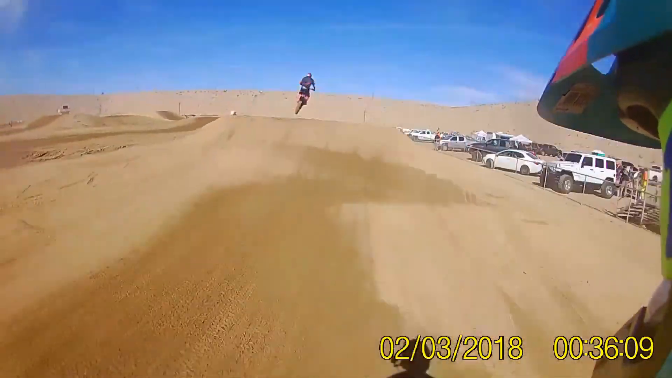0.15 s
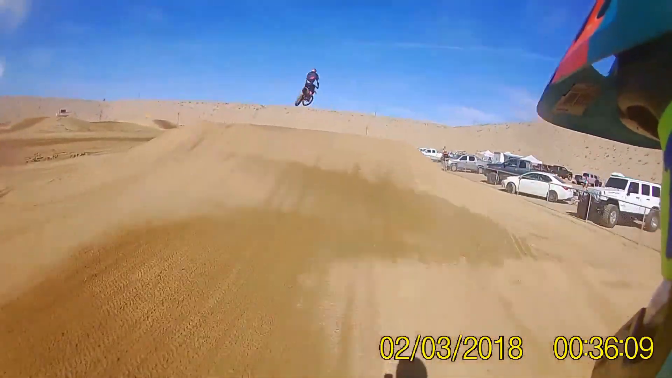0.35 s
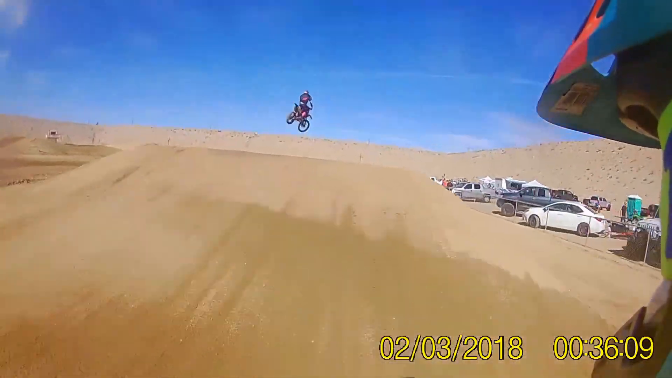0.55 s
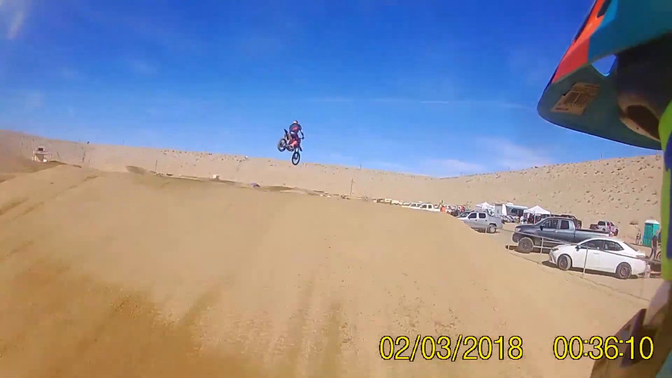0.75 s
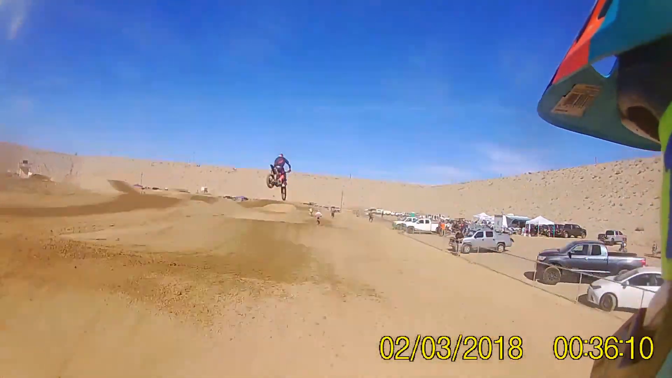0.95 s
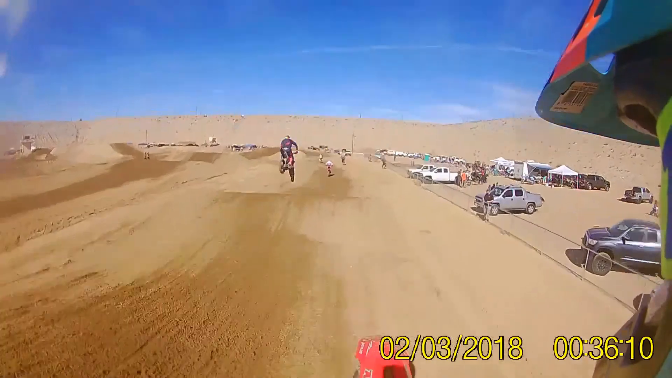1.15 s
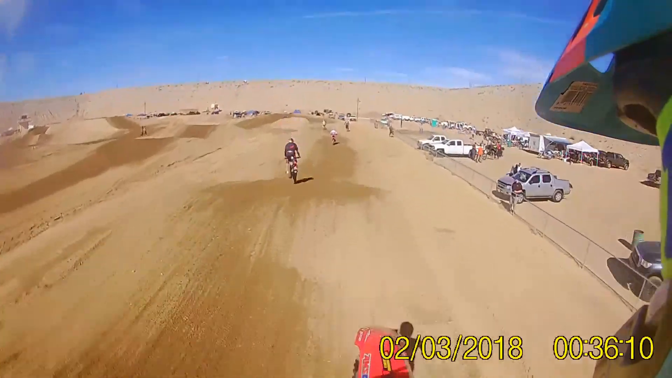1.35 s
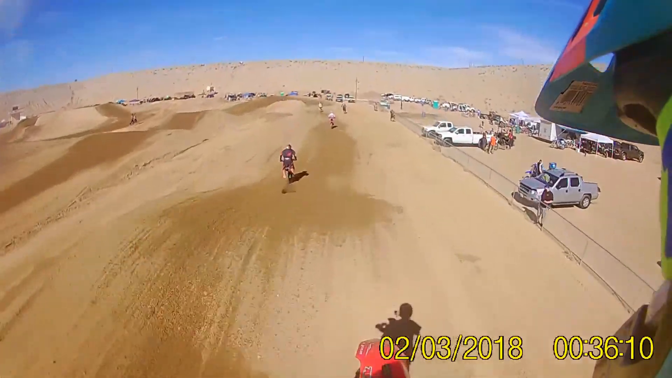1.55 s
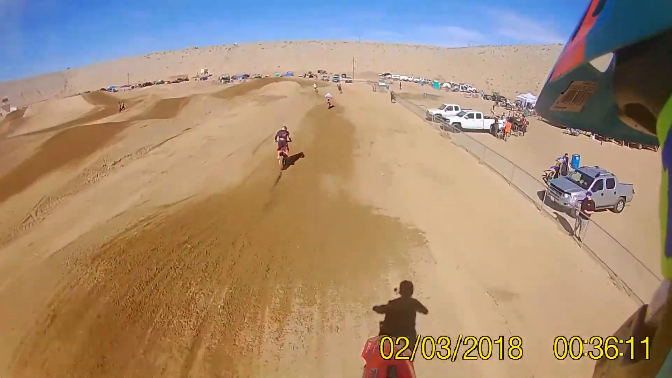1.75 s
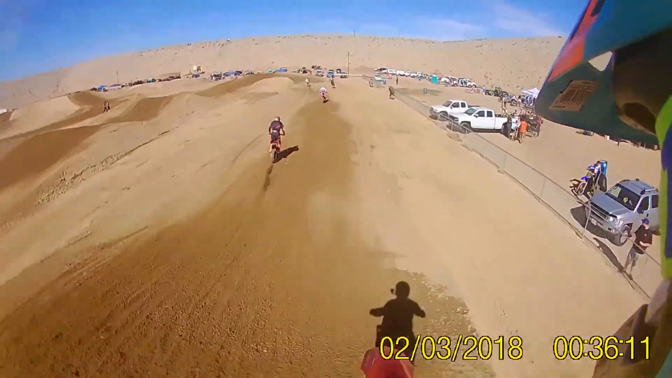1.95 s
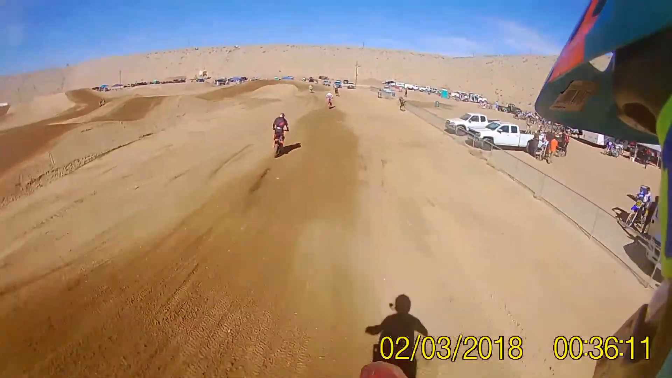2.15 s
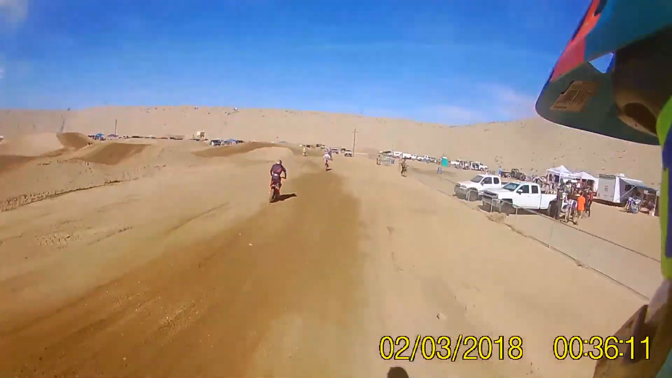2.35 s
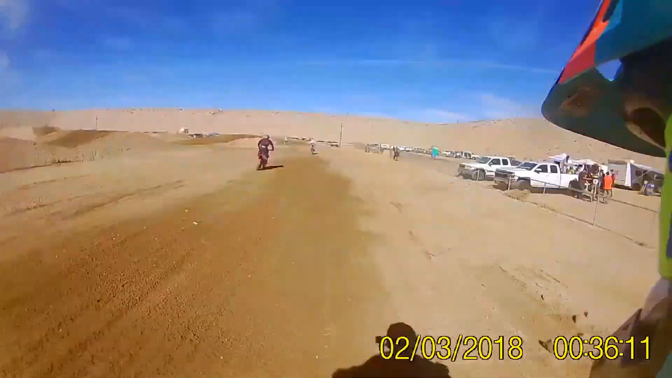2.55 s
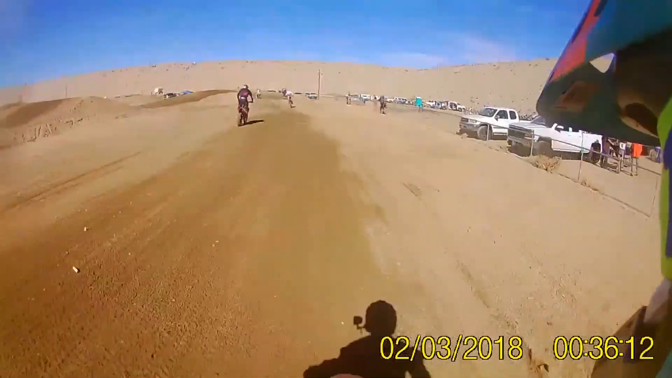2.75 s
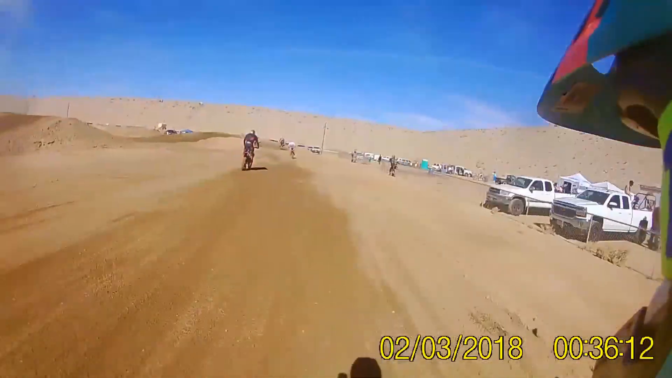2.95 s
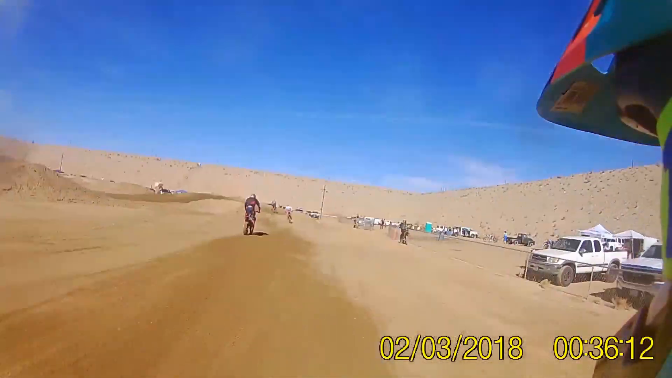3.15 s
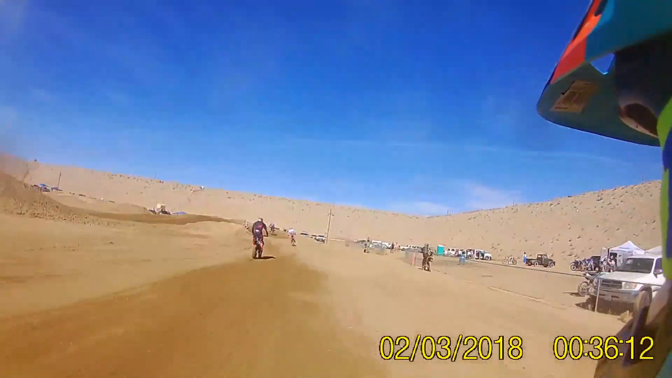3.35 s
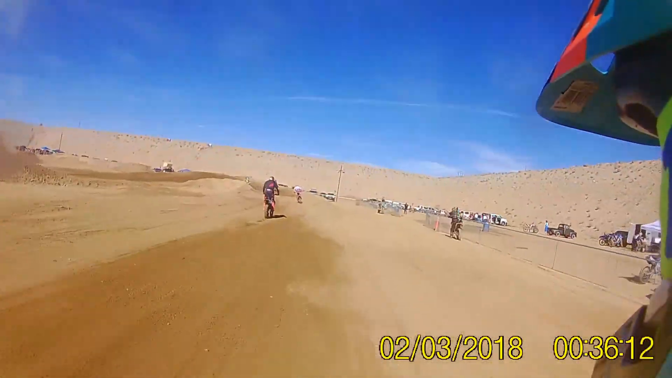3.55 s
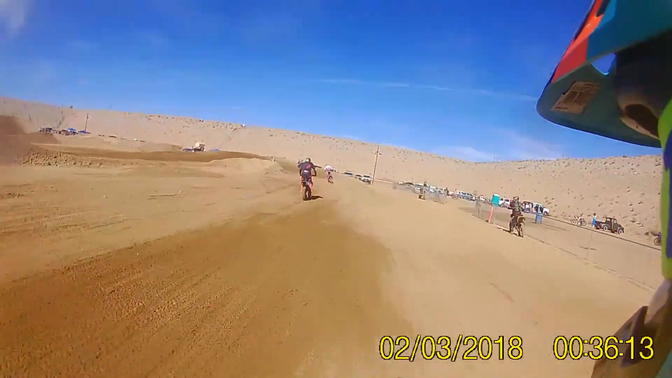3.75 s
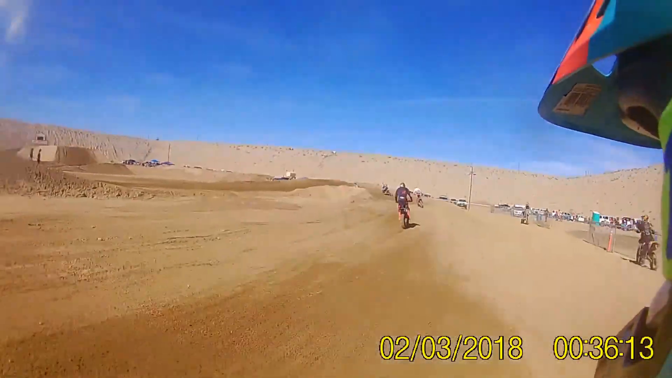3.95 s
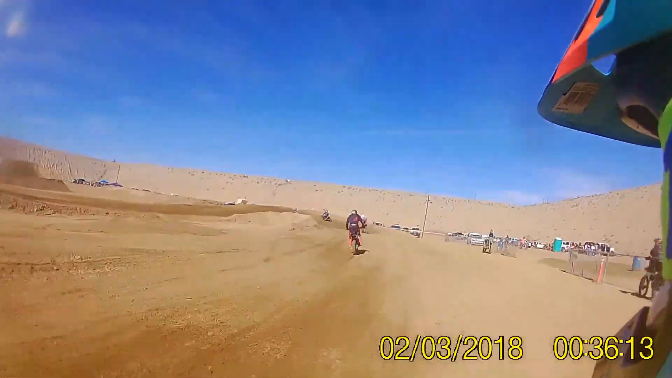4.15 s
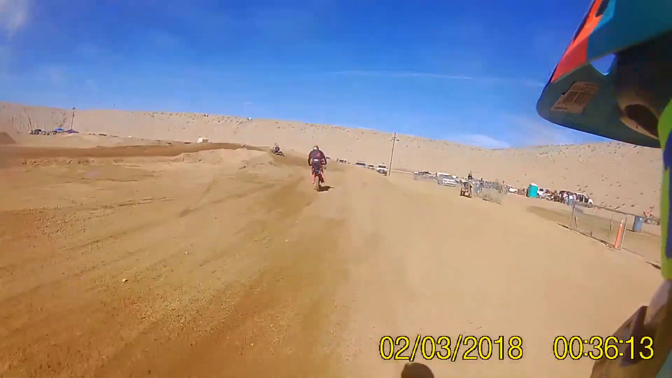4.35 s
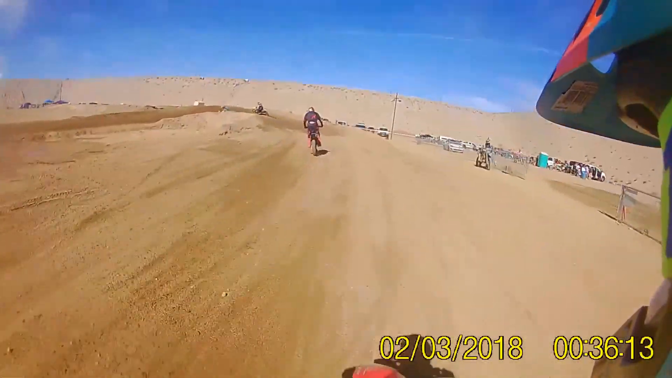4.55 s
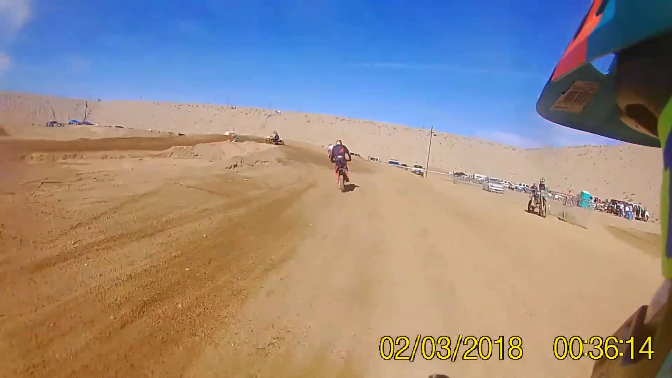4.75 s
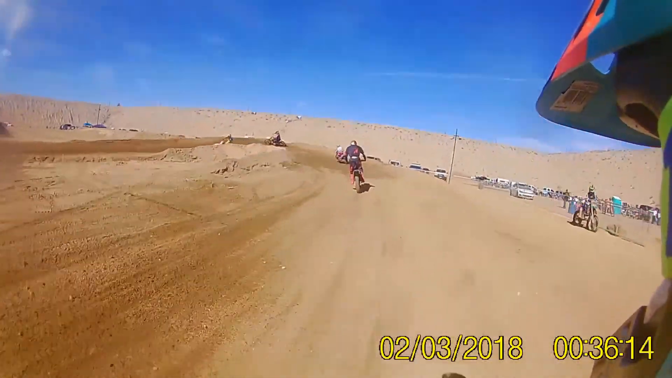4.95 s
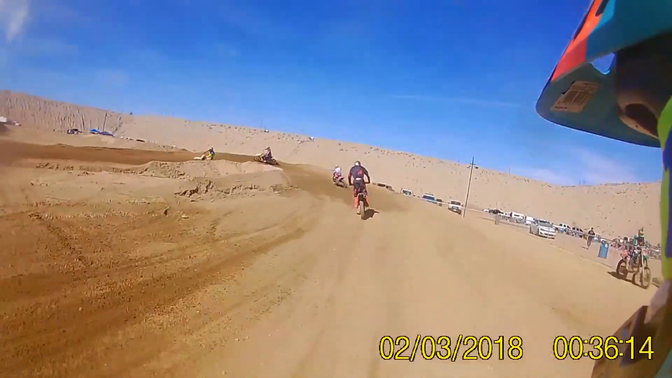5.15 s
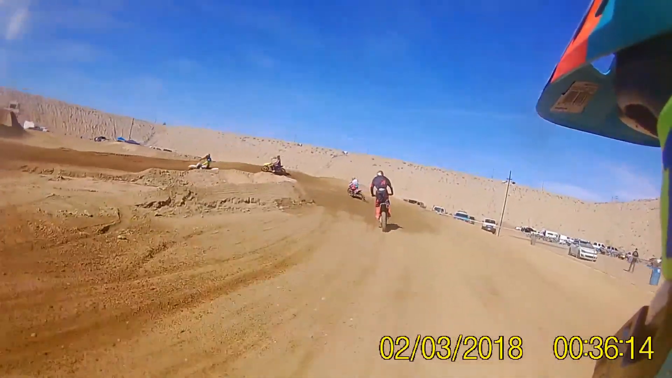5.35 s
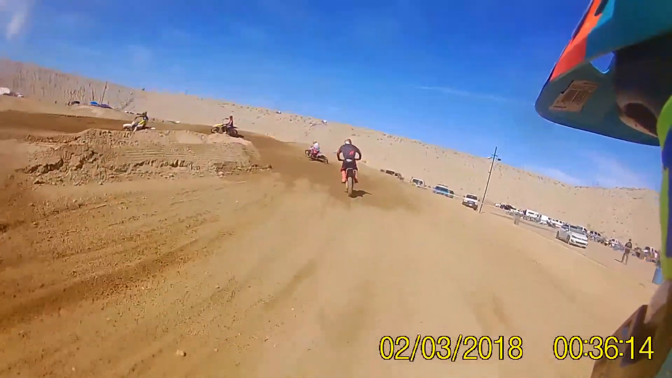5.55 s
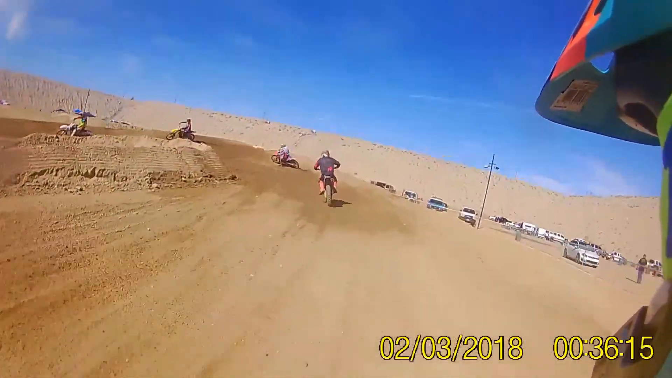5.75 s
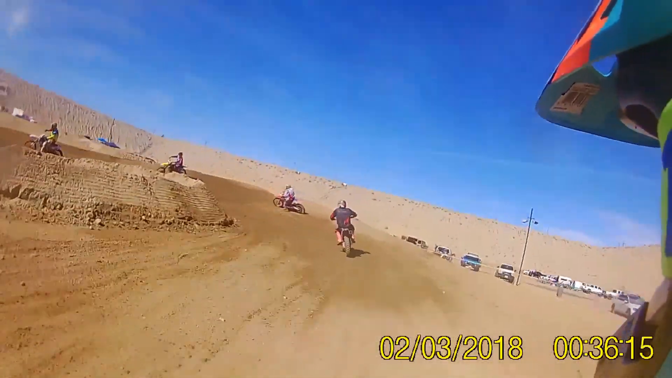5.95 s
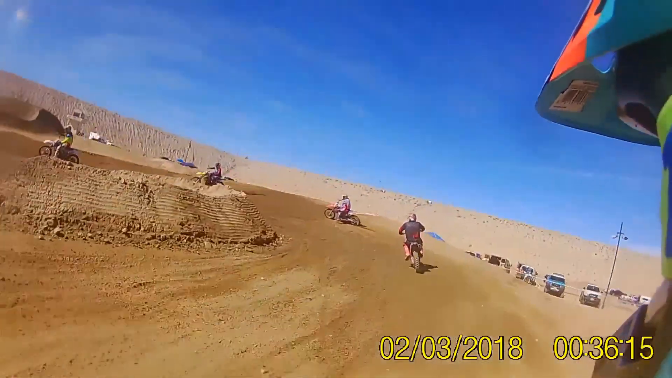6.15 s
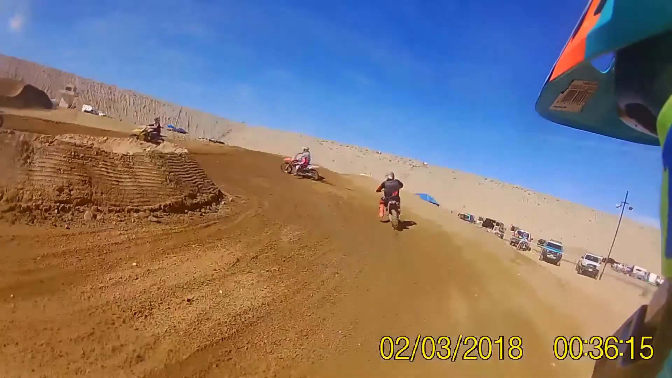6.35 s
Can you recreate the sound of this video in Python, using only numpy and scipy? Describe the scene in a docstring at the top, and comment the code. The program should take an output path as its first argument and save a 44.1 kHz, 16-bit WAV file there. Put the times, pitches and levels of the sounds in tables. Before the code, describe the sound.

Heard from inside a helmet camera's plastic housing, a motocross engine blips and coasts through buffeting wind, with one cracking landing jolt and small grit taps.

```python
"""A dirt track, heard from a camera in a plastic housing on a motocross helmet.
The single-cylinder engine barks on each blip of the throttle: firing pulses ring the pipe, gas noise follows.
Between blips it coasts as lumpy noise. Wind rumbles at the port, and pressure pops there, from wind and from
the jolt of the landing, when the housing slams and the mount cracks. Grit and sand tap the shell, the visor
flaps, and air hisses past. Resonances of the housing colour the engine, the hiss and the slams."""
import sys
import numpy as np
from scipy import signal
from scipy.io import wavfile
from scipy.ndimage import uniform_filter1d

SR = 44100
rng = np.random.default_rng(int(sys.argv[2]) if len(sys.argv) > 2 else 0)


def transcribe(signal):
    """Save signal, clipped to [-1, 1], as a 16-bit WAV file at the path in sys.argv[1]."""
    frames = np.atleast_2d(signal).T
    limited = np.clip(frames, -1, 1)
    pcm = np.round(limited * 32767).astype(np.int16)
    wavfile.write(sys.argv[1], SR, pcm)


N = 282240
T = np.arange(N) / SR


def amp(db):
    """Decibels to a linear factor."""
    return 10 ** (np.asarray(db) / 20)


def evened(x):
    """Scale to an RMS of 1."""
    return x / np.sqrt(np.mean(x ** 2) + 1e-20)


def level_curve(rows):
    """Straight lines in dB between the points of a level table."""
    s, db = np.transpose(rows)
    return np.interp(T, s, db)


def add(mix, s, sound):
    """Mix a sound in from second s, cut at the end of the scene."""
    part = mix[round(s * SR):][:len(sound)]
    part += sound[:len(part)]


def band(x, lo_hz, hi_hz):
    """Keep the range between two frequencies."""
    return signal.sosfilt(signal.butter(3, [lo_hz, hi_hz], "band", fs=SR, output="sos"), x)


def colour(x, points):
    """Causal, minimum-phase filter with the given spectrum."""
    f, db = np.transpose(points)
    hz = abs(np.fft.fftfreq(8192, 1 / SR))
    gain_db = np.interp(np.log(hz + 1), np.log(f + 1), db, left=-70, right=-90)
    log_gain = gain_db * np.log(10) / 20
    # the Hilbert transform of the log gain supplies the minimum phase
    spectrum = np.exp(np.conj(signal.hilbert(log_gain)))
    taps = np.fft.ifft(spectrum).real[:4096]
    return signal.oaconvolve(x, taps)[:len(x)]


def ring(x, modes):
    """Sum of two-pole resonances, each with the given gain at its peak."""
    out = np.zeros(len(x))
    for hz, width_hz, db in modes:
        out += amp(db) * signal.lfilter(*signal.iirpeak(hz, hz / width_hz, SR), x)
    return out


def lumps(ms):
    """Slow random wander of unit size: noise averaged twice over the given time."""
    size = int(ms * SR / 1000)
    once = uniform_filter1d(rng.standard_normal(N), size)
    return evened(uniform_filter1d(once, size))


def bursts(events, ms, rattle):
    """Noisy blows of even energy: a quick start, then a weaker rattle as the parts settle."""
    out = np.zeros(N)
    u = T[:1500] * 1000 / ms
    shape = (1 - np.exp(-8 * u)) * (np.exp(-u) + rattle * np.exp(-u / 7))
    for s, db in events:
        blow = rng.standard_normal(1500) * shape
        add(out, s, amp(db) * blow * np.linalg.norm(shape) / np.linalg.norm(blow))
    return out


# throttle openings: (first firing t/s, throttle shut t/s, firing rate f/Hz, load level/dB,
# steady share of the gas noise [0-1], pipe boom level/dB)
BLIPS = [(0.0, .125, 48.8, -39.5, .5, -1), (.145, .48, 47, -45.5, .4, 0), (.745, .965, 47, -39.5, .6, 2.5),
         (.978, 1.08, 44, -42.5, .5, 4), (1.5624, 1.68, 43.2, -33.5, .2, 4),
         (1.832, 1.93, 52.7, -34.5, .2, 4), (2.765, 3.075, 44.6, -40.5, .3, 2),
         (3.7565, 3.928, 46.6, -29.5, .07, -2.5), (4.0, 4.19, 45, -46, .4, 3),
         (5.2865, 5.395, 45.2, -34, .1, -8)]
# tone of the exhaust blast: (f/Hz, level/dB)
BLAST_TONE = [(60, -22), (150, -10), (400, -10), (650, -13), (800, -25), (1150, -14), (1700, -18),
              (2300, -15), (2700, -40)]
# standing wave of the pipe: (f/Hz, width f/Hz, level/dB)
PIPE_RING = [(275, 45, 23.5), (540, 140, 9)]
# tone of the gas noise behind each blast: (f/Hz, level/dB)
RASP = [(300, 6), (600, 4), (900, -7), (1250, 1), (1700, -4), (2150, -2), (2650, -13), (5000, -18),
        (8000, -34.5)]
LOAD_SAG_DB_PER_S, BLAST_DB, PUFF_DB = 10, 41.5, 14
REPEAT_SHARE = .55  # part of the gas noise power that is alike from one firing to the next
RING_DELAY_S = .009  # the standing wave peaks after the blast has come back up the pipe


def exhaust():
    """With the throttle open: a blast per firing down the pipe, and a puff of gas noise behind it."""
    fired, booms, puffs = np.zeros((3, N))
    for start, shut, rate, load_db, steady, boom_db in BLIPS:
        t = np.arange(0, shut - start, 1 / SR)
        cycle, phase = (rate * t).astype(int), rate * t % 1
        filling_db = -6 * np.exp(-t / .035)  # the cylinder takes a few cycles to fill
        uneven_db = 0.4 * rng.standard_normal(40)[cycle]
        strength = amp(load_db - LOAD_SAG_DB_PER_S * t + filling_db + uneven_db)
        closing = np.clip((t[-1] - t) / .04, .3, 1)  # weaker as the throttle closes
        firings = np.diff(cycle, prepend=-1) * strength * closing
        add(fired, start, firings)
        add(booms, start + RING_DELAY_S, amp(boom_db) * firings)
        # a second, weaker puff follows as the wave returns from the silencer
        returned = .3 * (phase > .38) * np.exp(-(phase - .38) / .14)
        puff = np.exp(-phase / .17) + returned + steady
        fresh, alike = rng.standard_normal((2, len(t)))
        repeated = alike[(phase / rate * SR).astype(int)]
        gas = np.sqrt(1 - REPEAT_SHARE) * fresh + np.sqrt(REPEAT_SHARE) * repeated
        fade = np.clip((t[-1] - t) / .022, 0, 1)
        add(puffs, start, gas * strength * puff * fade)
    standing_wave = ring(colour(booms, BLAST_TONE), PIPE_RING)
    thrum = amp(BLAST_DB) * (colour(fired, BLAST_TONE) + standing_wave)
    return thrum + amp(PUFF_DB) * colour(puffs, RASP)


# coasting engine and chain, ahead of the housing: (t/s, level/dB)
COAST = [(0, -35.5), (.6, -40.5), (.95, -35.5), (1.3, -40), (1.75, -35.5), (2.2, -38.5), (3.1, -38),
         (3.65, -40.5), (3.95, -37), (4.45, -43.5), (5.25, -42.5), (6.4, -46)]
# tone of the engine noise: (f/Hz, level/dB)
CLATTER = [(100, 3), (250, 5), (420, -4), (600, -9), (900, -11), (1700, -10.5), (2300, -17.5),
           (2700, -22.5), (4000, -23), (6000, -74)]


def coasting():
    """Engine and chain clatter, blurred into lumpy noise."""
    noise = rng.standard_normal(N) * amp(1.38 * lumps(6.3))
    return amp(level_curve(COAST)) * evened(colour(noise, CLATTER))


# resonances of the plastic housing: (f/Hz, width f/Hz, level/dB above the plain wall)
HOUSING = [(361.6, 16, 3), (1245.4, 61, 10), (1502, 85, -2), (2045, 197, 3.5), (5800, 67, 2.5),
           (7330, 610, -3.5)]


def through_housing(x):
    """The plain wall passes the sound as it is; the resonances of the plastic ring on top."""
    return x + ring(x, HOUSING)


# the housing slams in its mount on landing: (t/s, level/dB ahead of the filters)
KNOCKS = [(2.4305, -15.5), (2.4335, -18.5), (2.4405, -17.5), (2.469, -17.5), (2.494, -12), (2.531, -27)]


def slams():
    """Short noisy blows: a knock coloured by the housing, over a dull thud."""
    blows = bursts(KNOCKS, 2.0, 0.12)
    knock = band(through_housing(blows), 730, 2400)
    thud = band(blows, 204, 560)
    return amp(6.5) * knock + amp(11.5) * thud


# cracks of the mount: (t/s, level/dB ahead of the filters)
CRACKS = [(2.4405, -30.5), (2.4538, -23), (2.4694, -35), (2.4965, -23.5), (2.5338, -22.5), (2.5606, -43)]
# resonance of the mount: (f/Hz, width f/Hz, level/dB)
MOUNT = [(4280, 430, 19)]


def mount_cracks():
    """Brief noise bursts, plain and through the bright resonance of the mount."""
    cracks = bursts(CRACKS, 1.35, 0.074)
    return amp(3) * band(ring(cracks, MOUNT) + amp(-0.5) * cracks, 910, 7100)


# grit tapping the shell: (t/s, level/dB of the impulse)
TAPS = [(0.69, -23), (2.378, -22), (3.078, -24), (4.153, -27), (4.316, -30.5), (4.364, -34), (4.505, -24),
        (4.6, -34), (4.793, -35), (4.925, -29.5), (4.985, -30), (5.071, -34), (5.21, -32), (5.494, -25.5),
        (5.668, -32), (5.743, -32.5), (5.966, -31), (6.217, -33)]
# rings of the tapped shell: (f/Hz, width f/Hz, level/dB)
SHELL = [(415, 110, -4), (915, 340, -6.5), (1277, 87, 5.5), (1444, 63, -1), (2090, 46, 3)]


def grit_taps():
    """Each grain is a soft, brief push that sets the shell ringing."""
    grit = np.zeros(N)
    for s, db in TAPS:
        add(grit, s, [amp(db)])
    contacts = signal.lfilter(np.hanning(24), 1, grit)  # half a millisecond of contact
    return amp(13.0) * ring(contacts, SHELL)


# fine sand clicking on the lens: (t/s, level/dB ahead of the filter)
TICKS = [(.099, -33), (2.778, -37), (5.945, -41)]


def sand_ticks():
    """Tiny noise bursts, treble only."""
    return band(bursts(TICKS, 1.4, .05), 6800, 9900)


# dull flaps of the visor: (centre t/s, peak level/dB, f/Hz, half-length [ms])
FLAPS = [(1.667, -10, 143, 10), (2.058, -24, 246, 17), (2.7106, -11.5, 216, 14.7)]


def visor_flaps():
    """A few swings of low pressure wave under a flat-topped envelope, sucking at the centre."""
    out = np.zeros(N)
    for s, db, hz, ms in FLAPS:
        t = np.arange(-ms / 1000, ms / 1000, 1 / SR)
        envelope = np.exp(-(t * 3000 / ms) ** 4)
        add(out, s + t[0], -amp(db) * np.cos(2 * np.pi * hz * t) * envelope)
    return out


POP_SHARPNESS = 1.62  # exponent on the peak and its sag
BUILD_MS, FLIP_SHARE = 4.9, 0.12  # pressure first builds the other way, then flips within a share of the rise


def pop(rise_ms, build_share):
    """A slow build-up one way, a flip at the middle to a peak near 1 the other way, then a sag."""
    ms = np.arange(-2000, 2000) * 1000 / SR
    u = np.maximum(ms, 0) / rise_ms
    build = np.where(ms < 0, np.exp(ms / BUILD_MS), np.exp(-u / FLIP_SHARE))
    return (u * np.exp(1 - u)) ** POP_SHARPNESS - build_share * build


# pressure pops, from wind and from the jolt of the landing, ahead of the port:
# (peak t/s, peak pressure [+ pushes, - sucks], rise [ms], build-up the other way [share of the peak])
POPS = [(.109, 0.21, 3.2, .5), (0.135, -0.29, 2.3, 0.65), (0.919, 0.087, 1.05, 0.96),
        (0.925, -0.11, 0.89, 0.22), (.981, -0.22, 1.5, 0.43), (1.0, -0.17, 2.2, .3),
        (1.034, 0.2, 0.78, 0.36), (1.128, -0.23, 2.9, 0.42), (1.156, 0.22, 2.27, 0.38),
        (1.506, -0.16, 4.4, 0.43), (1.65, .1, 5.7, .3), (1.906, -0.1, 0.38, 0.49), (2.431, -0.26, 2, 0.09),
        (2.4387, 0.47, 6.1, 0.11), (2.4411, -0.79, 0.4, 0.11), (2.4439, -0.42, 1.5, .11),
        (2.465, 0.25, 6.1, .3), (2.4704, -0.38, 1.54, 0.38), (2.474, -0.86, 2.5, 0.65),
        (2.49, 0.64, 8.4, 0.21), (2.495, -0.28, 3, .1), (2.536, -0.64, 3.75, 0.59),
        (2.5396, 0.11, 1.8, 0.11), (2.569, 0.25, 2.6, 0.11), (2.649, 0.16, 0.67, 0.47),
        (3.041, 0.15, 2.4, 0.46), (3.306, 0.19, 0.99, 0.5), (3.351, 0.11, 4, 0.23),
        (3.434, -0.14, 3.5, 0.38), (3.924, 0.17, 4.4, 0.46), (3.938, 0.098, 1.4, .3),
        (3.953, 0.097, 1.1, 0.33), (4.825, 0.12, 3.9, .2), (4.88, -0.27, 2.46, 0.73),
        (4.907, -.11, 1.7, 0.44), (5.298, -0.029, 1.7, 0.12), (5.304, 0.13, 2.9, 0.37),
        (5.325, 0.11, 0.66, 0.79), (5.425, -0.07, 2, 0.73), (5.458, -0.085, 1.7, .2),
        (5.701, -0.099, 2.7, 0.49), (5.773, 0.13, 1.3, .3), (5.803, -0.13, 1.94, 0.85),
        (5.917, -0.18, 3, 0.62), (5.954, 0.33, 4.7, 0.74), (5.968, 0.18, 1.3, 1), (5.971, -0.69, 2.5, .2),
        (6.08, 0.17, 3.1, 1), (6.13, -0.58, 1.57, 0.17), (6.162, -.13, 1.3, 0.84), (6.19, 0.16, 2.5, 0.23),
        (6.226, -0.11, 3.1, 0.29)]
PORT_HZ = 734  # the narrow port rounds off the flip
WAKE_DB, WAKE_MS = -15, 4.4  # each pop leaves a short rough wake


def pressure_pops():
    """Sudden pressure swings, from wind and from the landing, each with a noisy wake, softened by the port."""
    pops = np.zeros(N)
    for s, pressure, rise_ms, build_share in POPS:
        sound = pop(rise_ms, build_share)
        add(pops, s - rise_ms / 1000 - len(sound) / 2 / SR, pressure * sound)
    step = 1000 / WAKE_MS / SR
    wake_level = signal.lfilter([step], [1, step - 1], abs(pops))
    wake = wake_level * evened(band(rng.standard_normal(N), 91, 503))
    port = signal.butter(1, [18, PORT_HZ], "band", fs=SR)  # the port leaks slow pressure
    return signal.lfilter(*port, pops + amp(WAKE_DB) * wake)


# wind rumble at the port, ahead of the band limit: (t/s, level/dB)
WIND = [(0, -33.5), (.7, -38.5), (1.07, -29.5), (1.57, -31.5), (1.8, -37.5), (2.44, -35), (2.6, -27),
        (3.15, -38), (3.4, -30), (3.68, -37), (4.06, -36), (4.7, -39), (4.88, -35.5), (5.15, -44),
        (5.45, -39), (5.8, -32), (6.13, -30.5), (6.4, -37)]
# tone of the rumble: (f/Hz, level/dB)
GUST = [(12, 19.5), (25, -1), (45, -5), (100, -3), (200, -13.5), (400, -28), (800, -74)]


def wind_rumble():
    """Turbulence at the port: low noise with a lumpy level."""
    eddies = rng.standard_normal(N) * amp(3 * lumps(9))
    return band(amp(level_curve(WIND)) * evened(colour(eddies, GUST)), 20, 2000)


# rush of air and chain, ahead of the housing: (t/s, level/dB)
RUSH = [(0, -48), (1.0, -49.5), (2.3, -50), (2.5, -48), (3.2, -50.5), (4.0, -51), (4.7, -54), (5.8, -54),
        (6.1, -59), (6.4, -57.5)]
# tone of the hiss: (f/Hz, level/dB)
AIR = [(1500, -4.5), (2500, -3), (4000, -4), (6400, -12.5), (8500, -18), (12200, -27), (12600, -49)]


def rush():
    """Steady hiss of air past the helmet, slightly patchy."""
    hiss = evened(colour(rng.standard_normal(N), AIR))
    return amp(level_curve(RUSH) + 1.12 * lumps(22)) * hiss


def scene():
    """Engine and hiss come through the housing; port pressure and blows are added directly."""
    inside = through_housing(exhaust() + coasting() + rush())
    shell = slams() + mount_cracks() + grit_taps() + sand_ticks() + visor_flaps()
    port = pressure_pops() + wind_rumble()
    return (inside + shell + port)[None]


EDGE_HZ = 12370  # top of the treble


def record(dry):
    """The input stage rounds off the largest peaks; then a steep low-pass limits the band."""
    rounded = 1.2 * np.tanh(dry / 1.2)
    low_pass = signal.firwin(511, EDGE_HZ, window=("kaiser", 9), fs=SR)
    return signal.oaconvolve(rounded, low_pass[None], "same")


dry = scene()
out = record(dry)
transcribe(out)
```